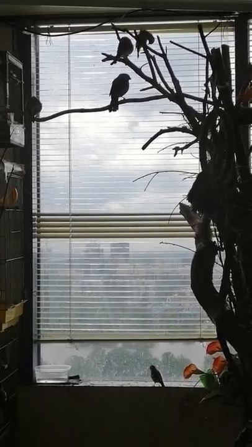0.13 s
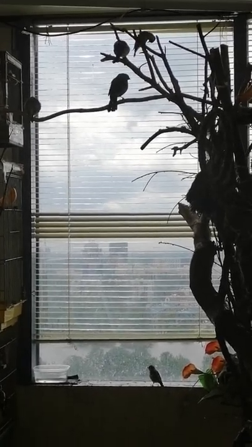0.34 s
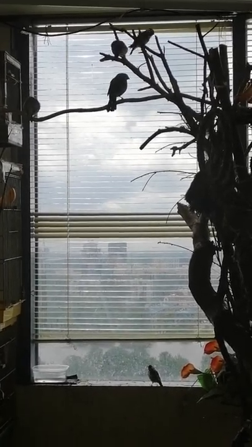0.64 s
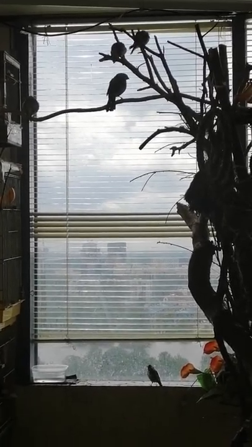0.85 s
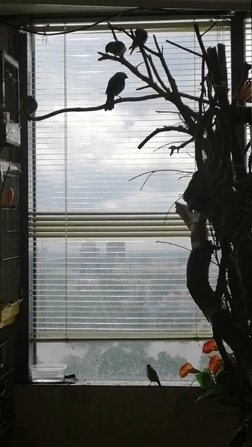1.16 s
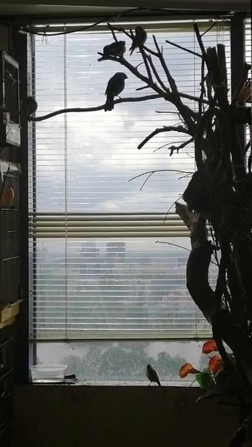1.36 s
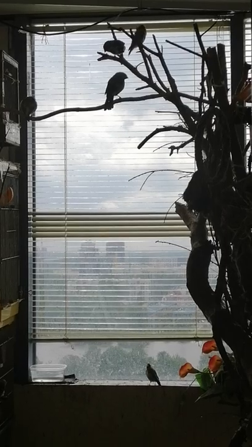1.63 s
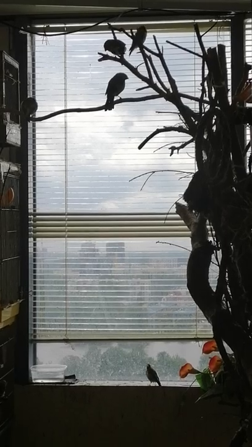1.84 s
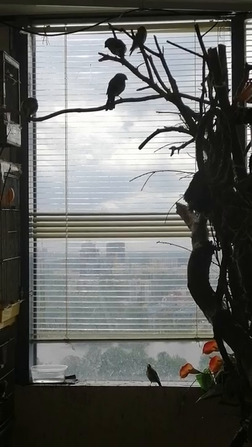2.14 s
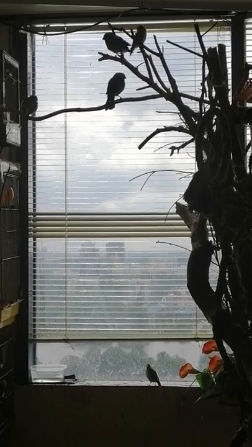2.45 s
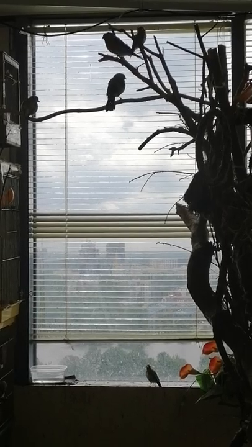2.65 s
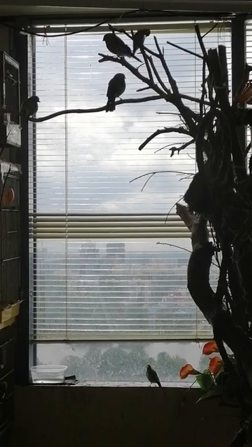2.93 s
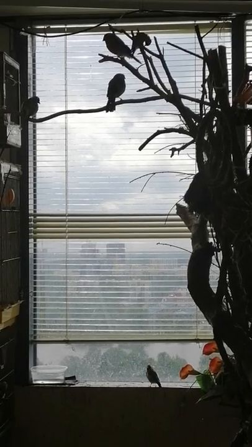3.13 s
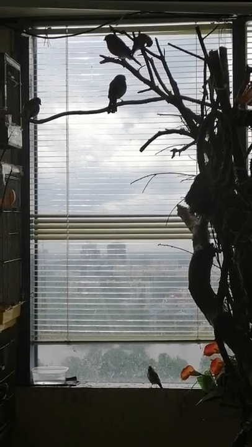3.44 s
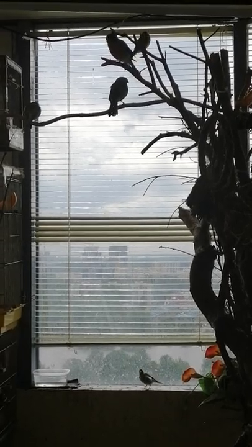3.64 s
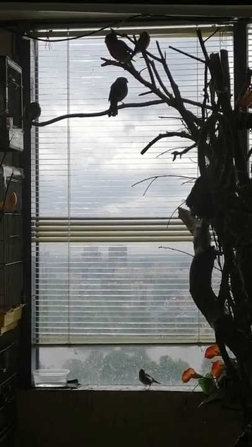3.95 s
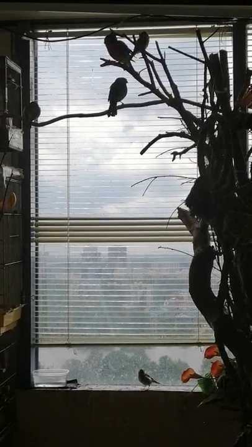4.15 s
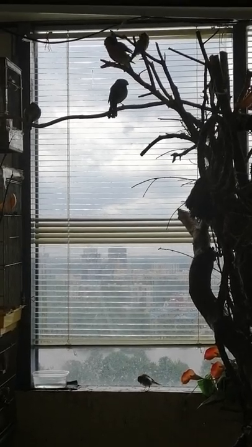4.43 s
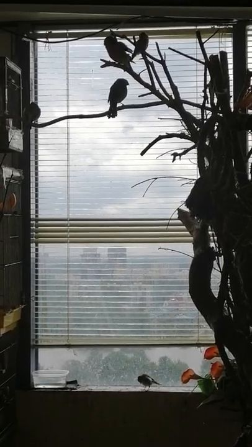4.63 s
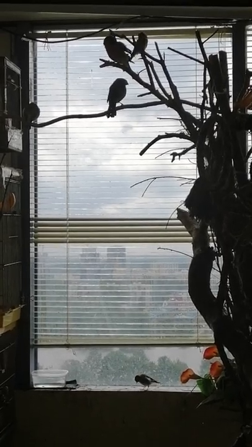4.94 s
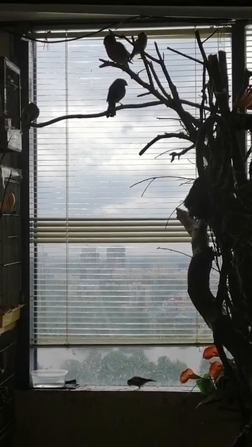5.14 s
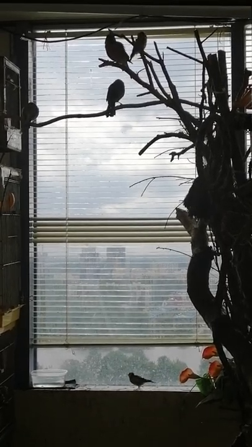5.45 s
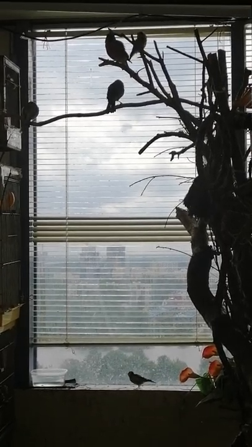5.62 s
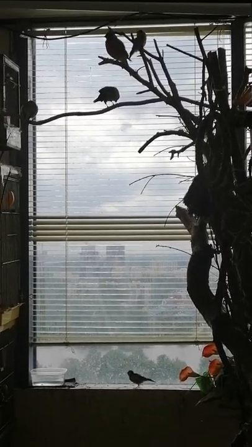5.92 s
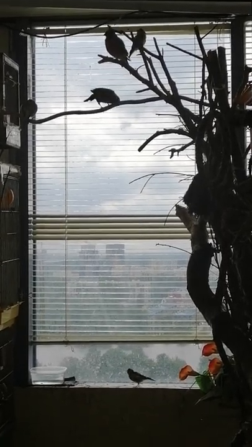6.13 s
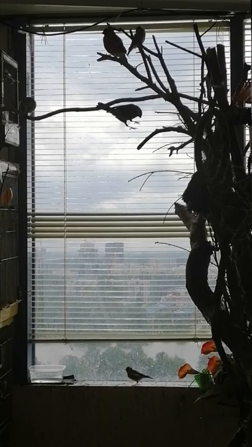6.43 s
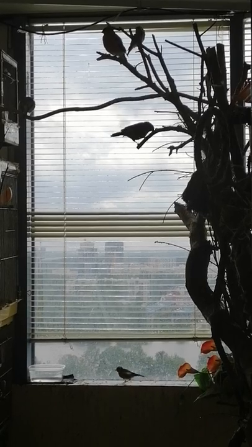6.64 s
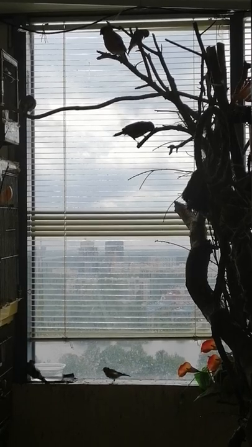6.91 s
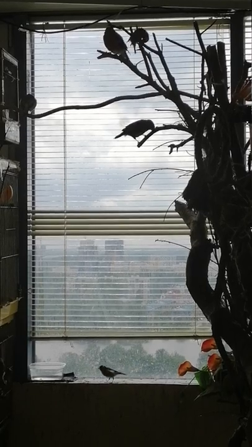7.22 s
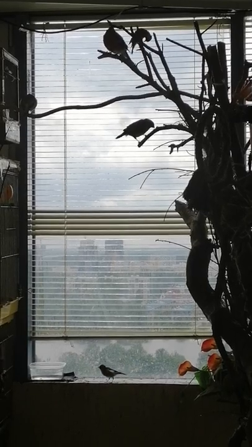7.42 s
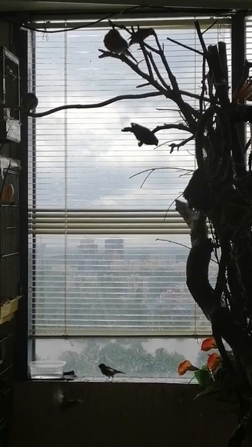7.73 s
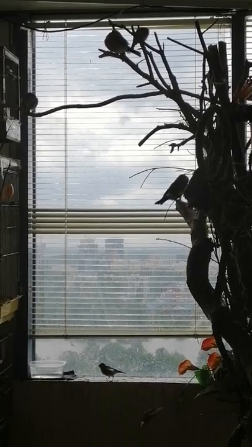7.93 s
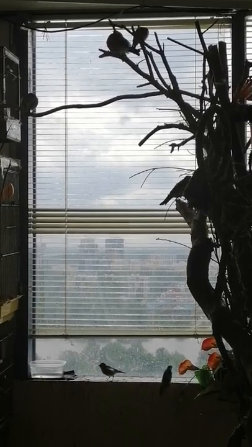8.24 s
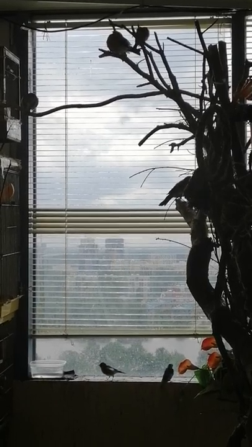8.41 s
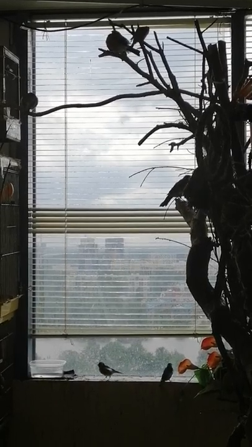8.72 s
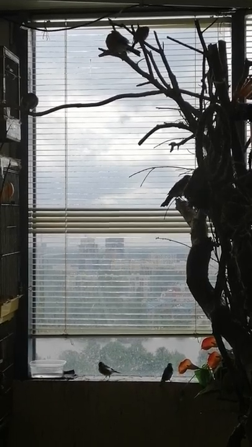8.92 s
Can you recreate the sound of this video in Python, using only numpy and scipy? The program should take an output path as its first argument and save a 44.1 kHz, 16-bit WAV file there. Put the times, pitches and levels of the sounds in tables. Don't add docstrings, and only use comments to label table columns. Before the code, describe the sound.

A handheld phone picks up a few little birds indoors, their short calls blurred by quick wall reflections. Scratchy chirps repeat, mixed with soft low whistles, fast upward and downward slides and dry beak clicks. After a lull and a momentary total silence, one small wooden knock leads into renewed chatter. High piercing slides stand out late, before a final nasal squawk. Quiet room air and hand rumble remain, with treble leaning left.

```python
import sys
import numpy as np
from scipy import signal
from scipy.fft import rfft, irfft, next_fast_len
from scipy.io import wavfile
from scipy.ndimage import map_coordinates

SR = 44100
rng = np.random.default_rng(int(sys.argv[2]) if len(sys.argv) > 2 else 0)


def master_out(mix):
    frames = np.transpose(np.atleast_2d(mix))
    ceiling = np.clip(frames, -1, 1)
    pcm = np.round(ceiling * 32767).astype(np.int16)
    wavfile.write(sys.argv[1], SR, pcm)


def elevation(decibels):
    levels = np.asarray(decibels, float)
    return 10 ** (levels / 20)


N = 399987


def unit_rms(x):
    return x / np.sqrt(np.mean(x ** 2) + 1e-20)


def along(points, f_hz):
    knot_hz, value = np.transpose(points)
    return np.interp(np.log(f_hz + 1), np.log(knot_hz + 1), value)


def level(tables):
    t_s, level_db = np.vstack(tables).T
    return elevation(np.interp(np.arange(N) / SR, t_s, level_db))


def filtered(x, response):
    n = x.shape[-1]
    m = next_fast_len(n + 4096)
    spectrum = rfft(x, m) * response(np.fft.rfftfreq(m, 1 / SR))
    return irfft(spectrum, m)[..., :n]


def resonance(f, centre_hz, width_hz):
    return 1j * f * width_hz / (centre_hz * centre_hz - f * f + 1j * f * width_hz)


def wobble(size, rate_hz):
    return map_coordinates(rng.standard_normal(4000), [np.arange(size) * rate_hz / SR], mode="wrap")


def swell(u, rise, edge):
    rise = np.clip(rise, .02, .95)
    return np.clip(np.minimum(u / rise, (1 - u) / (1 - rise)) * edge, 0, 1)


def glide(length_s, start_hz, end_hz, unsteady, rate_hz):
    u = np.linspace(0, 1, round(length_s * SR))
    pitch_hz = start_hz * (end_hz / start_hz) ** u
    pitch_hz = pitch_hz * (1 + unsteady * wobble(len(u), rate_hz))
    return u, 2 * np.pi * np.cumsum(pitch_hz) / SR


# f/Hz, t60/s
WALL_DECAY = [(1000, 0.34), (2500, 0.33), (5000, 0.33), (8000, 0.26), (14000, 0.38)]


def add_in_room(out, t_s, note, direct_db):
    f_hz, t, z = signal.stft(rng.standard_normal((2, SR * 2 // 5)), SR, nperseg=256)
    decay = elevation(-60 * t / along(WALL_DECAY, f_hz)[:, None])
    tail = signal.istft(z * decay, SR, nperseg=256)[1]
    tail *= 1 - np.exp(-np.arange(tail.shape[1]) / SR / .006)
    tail /= np.linalg.norm(tail[0])
    tail[[0, 1], [0, 4]] = elevation(direct_db)
    heard = signal.fftconvolve(note[None], tail, axes=1)
    spot = out[:, round(max(t_s, 0) * SR):][:, :heard.shape[1]]
    spot += heard[:, :spot.shape[1]]


# f/Hz, correlation
PORT_LIKENESS = [(60, 0.73), (180, 0.89), (550, 0.53), (1650, -0.02), (4970, 0.33), (15000, 0.48)]


def port_noise(colour):
    def response(f_hz):
        angle = np.arccos(np.clip(along(PORT_LIKENESS, f_hz), -1, 1)) / 2
        return colour(f_hz) * np.array([np.cos(angle), np.sin(angle)])

    mid, side = filtered(rng.standard_normal((2, N)), response)
    return unit_rms(np.array([mid + side, mid - side]))


# t/s, level/dB
RUMBLE_LEVEL = [
    [(0.0, -67), (0.85, -70), (0.94, -61.5), (1.74, -66), (1.85, -61), (3.13, -66), (3.33, -71)],
    [(3.58, -62), (3.84, -70.5), (4.27, -61), (4.43, -68), (5.17, -65.5), (5.34, -81), (5.54, -62),
     (6.45, -66.5), (6.54, -62), (9.07, -66.5)],
]


def hand_rumble():
    noise = port_noise(lambda f: (f < 75) / (f + 25) * (f > 12))
    return level(RUMBLE_LEVEL) * elevation(2.0) * noise


# f/Hz, density level/dB
AIR_SPECTRUM = [(12, -29), (20, 12), (87, -9.5), (185, -1.5), (478, -11), (857, -8.5), (1540, -18.5),
                (3350, -25.5), (4190, -33.5), (4950, -19), (6190, -36), (7310, -22.5), (9390, -33.5),
                (15500, -33.5)]
# t/s, level/dB
AIR_LEVEL = [
    [(0.0, -58), (0.03, -62.5), (0.26, -60.5), (0.48, -64.5), (1.32, -61), (3.2, -60), (3.33, -61.5)],
    [(3.58, -63.5), (4.99, -60.5), (5.31, -66.5), (5.69, -58), (6.36, -64), (7.25, -61.5), (7.31, -57),
     (7.55, -63), (9.02, -63.5), (9.07, -64)],
]


def room_air():
    noise = port_noise(lambda f: elevation(along(AIR_SPECTRUM, f)) * (f > 75))
    return level(AIR_LEVEL) * elevation(4.5 + 0.71 * wobble(N, 5.3)) * noise


# f/Hz, level/dB, t60/s
PERCH_MODES = [
    (850, -46.5, 0.019),
    (4050, -42, 0.0067),
    (2600, -67.5, 0.022),
]


def perch_knock(out):
    t = np.arange(SR // 25) / SR
    knock = np.zeros(len(t))
    for f_hz, level_db, t60_s in PERCH_MODES:
        knock += elevation(level_db + 14 - 60 * t / t60_s) * np.sin(2 * np.pi * f_hz * t)
    add_in_room(out, 3.555, knock, direct_db=-4.5)


# t/s, f/Hz, level/dB
BEAK_TICKS = [(1.319, 8220, -53.5), (1.714, 7060, -59), (2.348, 9300, -59.5), (2.513, 8360.0, -55),
              (2.671, 8400, -61), (3.549, 8070.0, -63), (4.58, 7840, -57.5), (4.917, 10100, -62.5),
              (5.382, 8920.0, -71.5), (6.345, 7460, -49), (6.512, 7800, -52.5), (7.027, 7870, -50.5),
              (7.09, 9300, -60), (7.431, 9200, -57), (7.896, 8850, -56.5)]


def beak_ticks(out):
    t = np.arange(SR // 25) / SR
    for t_s, f_hz, level_db in BEAK_TICKS:
        snap = rng.standard_normal(len(t)) * elevation(-60 * t / 0.015)
        bright = filtered(snap, lambda f: resonance(f, f_hz, 3000) ** 2 + elevation(-28) * resonance(f, 9300, 6000))
        add_in_room(out, t_s + .003, elevation(level_db + 34) * bright, direct_db=-10)


# t/s, length/s, start f/Hz, end f/Hz, level/dB, loudest overtone f/Hz
NASAL_CALLS = [
    (0.0, 0.02, 1880, 1885, -38, 4860),
    (1.088, 0.034, 985, 965, -43, 5030),
    (4.998, 0.032, 1400, 1412, -62, 5100),
    (8.788, 0.013, 1036, 1040, -38.5, 5330),
    (8.986, 0.028, 1119, 1010, -31.5, 5500),
    (9.031, 0.052, 1666, 1597, -27.5, 5100),
]


def nasal_calls(out):
    k = np.arange(1, 13)[:, None]
    for t_s, length_s, start_hz, end_hz, level_db, beak_hz in NASAL_CALLS:
        u, phase = glide(length_s, start_hz, end_hz, unsteady=0.02, rate_hz=281)
        strength = abs(resonance(k * start_hz, beak_hz, 5000)) ** 3.06 * (k * start_hz < 13000)
        strength = strength * elevation(3.6 * rng.standard_normal(k.shape))
        stack = unit_rms((strength * np.sin(k * phase)).sum(0))
        add_in_room(out, t_s, elevation(level_db + 4) * swell(u, .3, 3) * stack, direct_db=-9)


# t/s, length/s, beak resonance f/Hz, level/dB, throat resonance level/dB, rising share 0-1
RASP_CALLS = [(0.244, 0.039, 6230, -33, -4.5, 0.4), (0.35, 0.12, 6350, -28, -9.5, 0.06),
              (0.527, 0.08, 6140.0, -27, -7, 0.52), (0.695, 0.06, 6180, -28, -8, 0.5),
              (0.829, 0.14, 6320, -29, -5.5, 0.09), (1.443, 0.13, 4680, -47, 9.5, 0.01),
              (1.897, 0.11, 7960, -57.5, -8, 0), (1.992, 0.062, 7500, -51.5, -5, 0.3),
              (2.108, 0.041, 7620, -49.5, -3, 0), (3.047, 0.035, 5940, -55.5, 2, 0.1),
              (3.253, 0.033, 5270, -44.5, -33, 0), (3.625, 0.048, 6120, -28.5, -8.5, 0.1),
              (3.843, 0.073, 6380, -28, -8, 0.37), (4.029, 0.054, 5980, -37, 0.5, 0),
              (4.429, 0.063, 5990, -38, -4, 0.5), (4.625, 0.07, 5900, -48, 4, 0.3),
              (4.829, 0.018, 5670, -50, 12, 0), (4.956, 0.071, 5740, -37.5, -2.5, 0.34),
              (5.22, 0.052, 6640, -48, 3, 0.1), (5.44, 0.06, 4990, -35.5, -12, 0),
              (5.678, 0.049, 5820, -44, -10, 0.3), (5.914, 0.069, 6530, -42, 1.5, 0),
              (6.365, 0.06, 5450, -26.5, -22.5, 0), (6.594, 0.018, 5900, -29.5, -33.5, 0),
              (6.761, 0.035, 5900, -32, -18, 0), (6.931, 0.024, 6660, -30, -12.5, 0),
              (7.24, 0.089, 6780, -57.5, 7, 0), (7.596, 0.065, 6410, -37.5, -2.5, 0.3),
              (7.748, 0.054, 6600, -38.5, -2, 0), (7.916, 0.071, 6250, -39.5, -2, 0.16),
              (8.475, 0.076, 5600, -42, 9.5, 0.64), (8.639, 0.06, 6980, -47.5, -6, 0.1),
              (8.795, 0.049, 7500, -50.5, 3, 0.3), (8.991, 0.055, 5930, -33.5, -12, 0.1)]


def rasps(out):
    for t_s, length_s, beak_hz, level_db, throat_db, rise in RASP_CALLS:
        u, phase = glide(length_s, 1300, 1450, unsteady=0.15, rate_hz=350)
        pulses = np.diff(np.floor(phase / (2 * np.pi)), prepend=0)
        pulses = pulses * elevation(6.7 * wobble(len(u), 616.4))
        shape = swell(u, rise, 1.8) * unit_rms(elevation(2.5 * wobble(len(u), 150)))
        breath = .5 * rng.standard_normal(len(u))
        drive = (unit_rms(pulses) * 0.57 + breath) * shape

        def tract(f):
            beak = resonance(f, beak_hz * 0.95, 3200) * resonance(f, beak_hz, 2700)
            throat = (resonance(f, 1846, 975) * resonance(f, 3920, 2130) * 1.944) ** 2
            top = resonance(f, 12800, 6700) ** 2
            return beak - elevation(throat_db - 3.0) * throat + elevation(-28) * top

        _, core = glide(length_s, beak_hz * .42, beak_hz * .51, unsteady=0.0703, rate_hz=450)
        core = core + 6 * wobble(len(u), 45.38)
        hoarse = np.sin(2 * core) + .45 * np.sin(3 * core) + elevation(throat_db - 6) * np.sin(core)
        call = filtered(drive, tract) + elevation(-12) * shape * hoarse
        add_in_room(out, t_s, elevation(level_db + 12) * call, direct_db=-9)


# t/s, length/s, start f/Hz, end f/Hz, level/dB, roughness 0-1
WHISTLE_NOTES = [(0.0, 0.035, 3100, 3190, -55.5, 0.86), (0.087, 0.18, 1482, 1279, -40, 0.1),
                 (0.456, 0.052, 3160, 3495, -36.5, 0.88), (0.735, 0.086, 1834, 2246, -34.5, 0.2),
                 (0.823, 0.069, 2300.0, 3445, -37, 0.88), (1.101, 0.028, 2860, 1860, -34.5, 0.84),
                 (1.323, 0.17, 4850, 4820, -56, 0.48), (1.385, 0.027, 2600.0, 2626, -47.3, 0.83),
                 (1.402, 0.039, 3400, 2400, -44.5, 0.8), (1.426, 0.023, 2300.0, 3800, -40.5, 0.86),
                 (1.465, 0.068, 5000.0, 4500.0, -59, 0.5), (1.493, 0.076, 2924, 2570, -39.5, 0.7),
                 (1.646, 0.018, 5400.0, 5400.0, -56, 0.18), (1.702, 0.026, 2397, 3294, -39, 0.84),
                 (1.713, 0.023, 4680, 5780, -39, 0.78), (1.72, 0.023, 3600, 2880, -45, 0.6),
                 (1.9, 0.046, 2550, 2370, -61.5, 0.2), (2.08, 0.085, 4860, 4840, -60, 0.37),
                 (2.124, 0.03, 7960, 6400, -43.5, 0.2), (2.245, 0.04, 5700, 5600.0, -75.3, 0.35),
                 (2.353, 0.012, 2500, 4430, -41, 0), (2.471, 0.019, 3750, 5270, -43, 0.1),
                 (2.665, 0.051, 3853, 3620, -43, 0.4), (2.773, 0.082, 4980, 4760, -54, 0.48),
                 (2.992, 0.071, 1900.0, 2340, -59.5, 0.5), (2.996, 0.098, 5460, 5650, -56, 0.3),
                 (3.037, 0.063, 7600.0, 7050, -55, 0.44), (3.042, 0.11, 2600.0, 3200.0, -60.5, 0.68),
                 (3.078, 0.072, 6040, 6350, -52.5, 0.5), (3.227, 0.038, 4170, 6000.0, -44, 0.7),
                 (3.244, 0.03, 8000.0, 7860, -54, 0.3), (3.258, 0.055, 6000.0, 5850, -39.5, 0.17),
                 (3.471, 0.03, 6100, 5710, -55, 0.48), (3.658, 0.043, 2700, 2600, -49.5, 0),
                 (4.043, 0.06, 3300, 2460, -52, 0.9), (4.293, 0.031, 5300, 8200.0, -41.5, 0),
                 (4.307, 0.038, 7930, 6780, -34.5, 0.54), (4.368, 0.025, 5550, 3920, -48, 0.57),
                 (4.558, 0.08, 4700.0, 4700.0, -56, 0.48), (4.589, 0.094, 2780, 2734, -29, 0.2),
                 (4.692, 0.043, 2490, 1766, -32.5, 0.16), (4.75, 0.03, 3760, 3770, -67, 0.25),
                 (5.021, 0.08, 5340, 5750, -43, 0.75), (5.067, 0.034, 2600.0, 2600.0, -46.5, 0.48),
                 (5.129, 0.049, 3750, 2770, -32.5, 0.64), (5.147, 0.11, 4300, 3530, -49, 1),
                 (5.135, 0.049, 5500.0, 5910, -41, 0.87), (5.193, 0.054, 2558, 2492, -24.5, 0),
                 (5.232, 0.024, 6900.0, 6780, -45.5, 0.2), (5.255, 0.073, 3300.0, 2825, -33.5, 0.57),
                 (5.265, 0.07, 2047, 1697, -36.5, 0), (5.685, 0.062, 5040, 5830, -38.5, 0.15),
                 (5.69, 0.18, 850.0, 930, -59, 0), (5.7, 0.14, 1650, 1920, -63, 0.1),
                 (5.8, 0.25, 4980, 4580, -53.5, 0.42), (5.891, 0.039, 4600.0, 3840, -40.5, 0.8),
                 (5.895, 0.033, 8420, 7480, -33.5, 0.65), (5.923, 0.056, 3260, 3630, -32.5, 0.45),
                 (5.911, 0.07, 6530, 6930, -39.5, 0.45), (5.931, 0.054, 2256, 1640, -49.5, 0.84),
                 (6.101, 0.0275, 2420, 1420, -46, 0.74), (6.248, 0.021, 2365, 1660, -42.5, 0.6),
                 (7.059, 0.13, 4980, 4800.0, -54.5, 0.48), (7.096, 0.031, 2600.0, 1500, -32.5, 0),
                 (7.253, 0.069, 3000.0, 2970, -59, 0.88), (7.286, 0.21, 1120, 1236, -52.5, 0.2),
                 (7.402, 0.019, 3650, 3600, -57, 0.48), (7.417, 0.044, 4250, 5450, -43, 0.76),
                 (7.503, 0.084, 3200.0, 2880, -46, 0.87), (7.518, 0.033, 4880, 8380, -28, 0),
                 (7.542, 0.037, 7900, 6960, -25.5, 0.74), (7.587, 0.045, 5000.0, 2500.0, -39, 0.7),
                 (7.596, 0.08, 3600, 2414, -54, 0.98), (7.754, 0.1, 5240, 5070, -48, 0.48),
                 (7.8, 0.041, 2310, 3375, -34, 0.77), (7.806, 0.18, 1519, 1591, -34.5, 0.2),
                 (7.902, 0.058, 3400, 2960, -45, 0.88), (7.926, 0.044, 7000.0, 7040, -33, 0.6),
                 (7.95, 0.14, 1580, 1422, -39.5, 0.18), (8.01, 0.05, 5310, 5416, -38.5, 0.48),
                 (8.16, 0.024, 5030, 8800.0, -25, 0.16), (8.183, 0.046, 8820, 6610, -24.5, 0.19),
                 (8.254, 0.0083, 5500.0, 3320, -34.5, 0.13), (8.473, 0.084, 1830, 2430, -32.5, 0),
                 (8.556, 0.034, 2316, 3400, -24, 0.66), (8.637, 0.035, 6510, 5420, -41, 0.86),
                 (8.717, 0.06, 8700.0, 7930, -49.5, 0.8), (8.793, 0.02, 5390, 5140, -33, 0.35),
                 (8.798, 0.04, 4000.0, 1822, -33, 0.3), (8.851, 0.06, 2800, 2026, -56, 0.76),
                 (8.994, 0.031, 1800, 1820, -43.5, 0.65)]


def whistles(out):
    for t_s, length_s, start_hz, end_hz, level_db, rough in WHISTLE_NOTES:
        u, phase = glide(length_s, start_hz, end_hz, unsteady=0.092 * rough ** 2, rate_hz=500)
        tone = np.sin(phase) + elevation(-42 + 24 * rough) * np.sin(2 * phase)
        flutter = elevation(5.3 * rough * wobble(len(u), 267) + 3.7 * wobble(len(u), 33))
        note = swell(u, .45, 2.5) * unit_rms(flutter) * tone
        add_in_room(out, t_s, elevation(level_db + 4) * note, direct_db=-9)


# f/Hz, level/dB
CASE_RESPONSE = [(1200, -3.5), (1500, -4), (1900, 3.5), (3300, 2.5), (4200, -1.5), (5100, 1.5),
                 (8500, -1.5), (10600, -5.5), (13000, -3), (15500, -8.5)]


def scene():
    birds = np.zeros((2, N))
    perch_knock(birds)
    beak_ticks(birds)
    nasal_calls(birds)
    rasps(birds)
    whistles(birds)
    return filtered(birds, lambda f: elevation(along(CASE_RESPONSE, f))) + room_air() + hand_rumble()


# f/Hz, left over right level/dB
PORT_MISMATCH = [(60, -0.5), (92, 4.5), (140, -3), (210, 0.5), (330, 2.5), (500, 0.5), (770, 0),
                 (1170, -5.5), (1790, -3.0), (2740, 0), (4190, -1.5), (6410, 19), (9810, 16), (15000, -0.5)]


def muffle_right(x):
    right_only = np.array([[0], [1]])
    return filtered(x, lambda f: elevation(-along(PORT_MISMATCH, f) * right_only) * (f < 15500))


def drop_hidden_treble(x, depth_db, slope_db):
    f_hz, _, z = signal.stft(x, SR, nperseg=2048)
    band = (f_hz // 430).astype(int)
    band_starts = np.flatnonzero(np.diff(band, prepend=-1))
    power = np.add.reduceat(abs(z) ** 2, band_starts, axis=1)
    octave = np.log2(np.arange(power.shape[1]) + .5)
    above = octave[:, None] - octave
    distance = np.where(above > 0, above, -4 * above)
    spread = elevation(2 * (depth_db + slope_db * distance))
    limit = np.einsum("ab,cbt->cat", spread, power)
    limit = limit * elevation(5 * rng.standard_normal(power.shape[1:]))
    keep = (power > limit)[:, band] | (f_hz < 3500)[:, None]
    return signal.istft(z * keep, SR, nperseg=2048)[1][:, :N]


# start t/s, end t/s
GAP = (3.379, 3.4985)


def drop_out(x):
    t = np.arange(N) / SR
    return x * ((t < GAP[0]) | (t > GAP[1]))


def top_cut(x):
    return signal.sosfilt(signal.butter(12, 16000, fs=SR, output="sos"), x)


def record(dry):
    heard = muffle_right(dry)
    heard = drop_hidden_treble(heard, depth_db=-33, slope_db=-9)
    heard = drop_out(heard)
    return top_cut(heard)


dry = scene()
out = record(dry)
master_out(out)
```